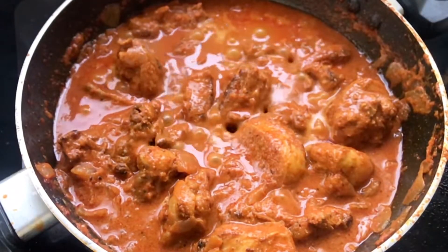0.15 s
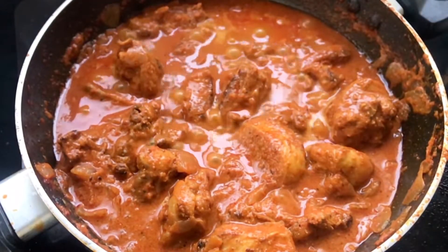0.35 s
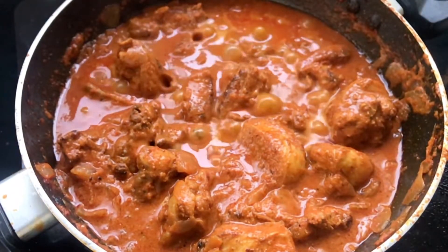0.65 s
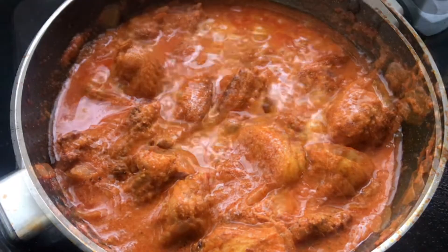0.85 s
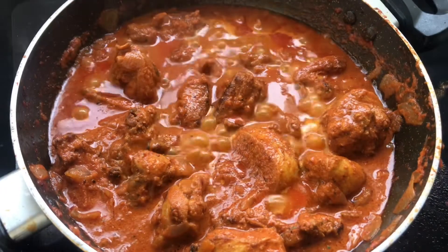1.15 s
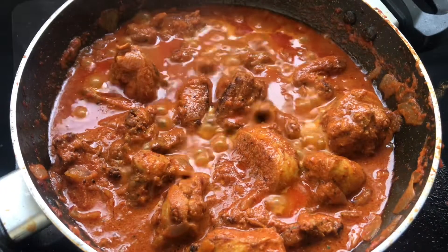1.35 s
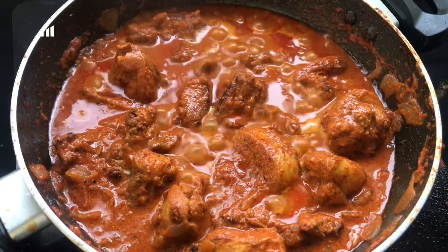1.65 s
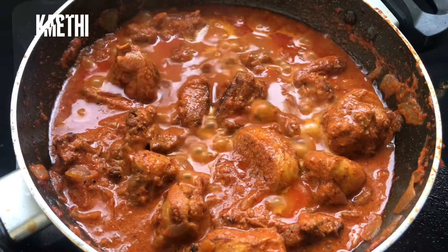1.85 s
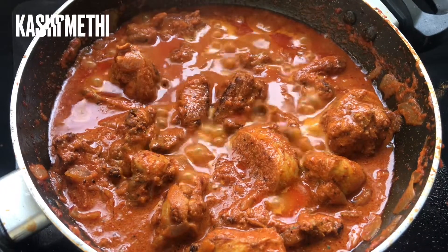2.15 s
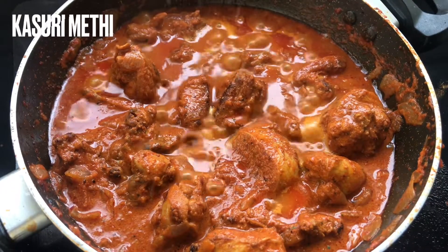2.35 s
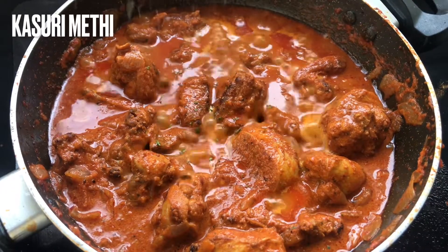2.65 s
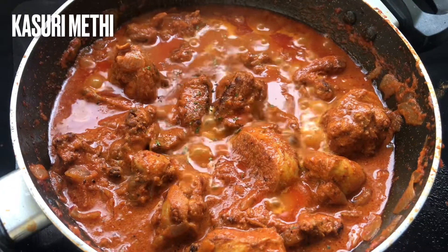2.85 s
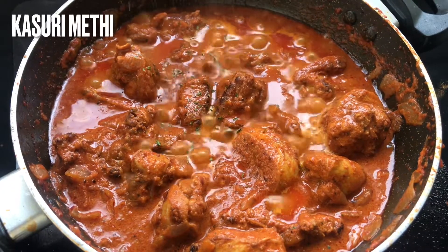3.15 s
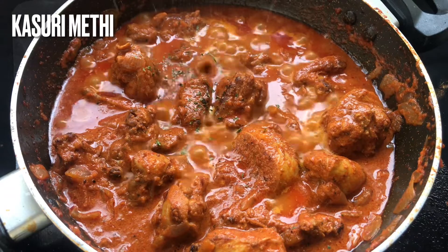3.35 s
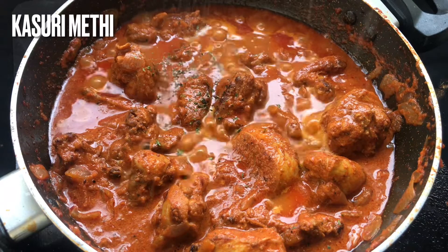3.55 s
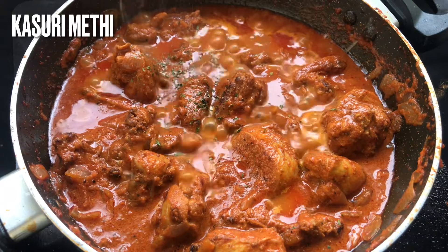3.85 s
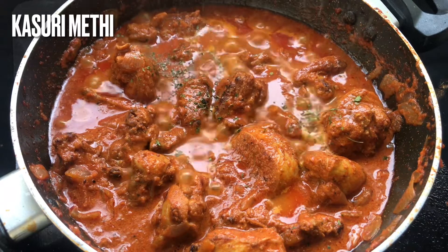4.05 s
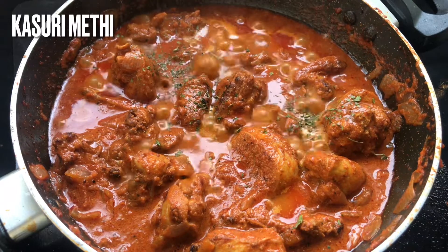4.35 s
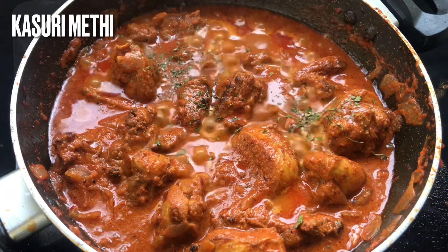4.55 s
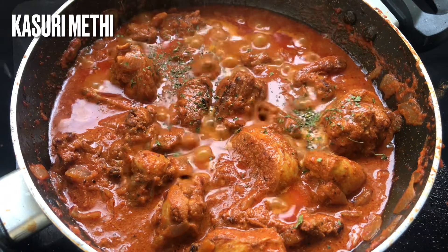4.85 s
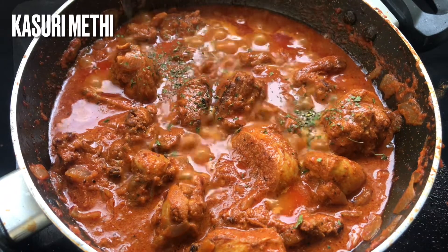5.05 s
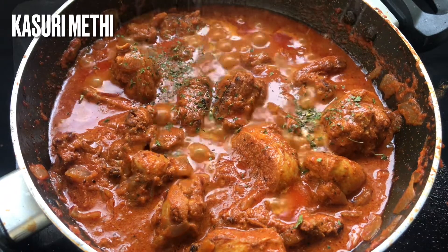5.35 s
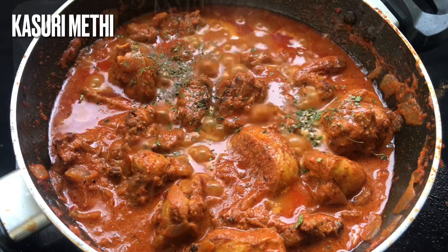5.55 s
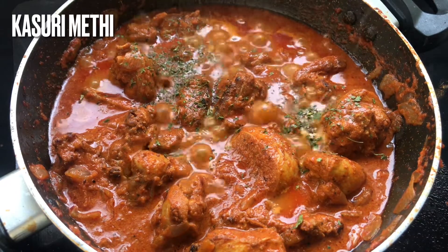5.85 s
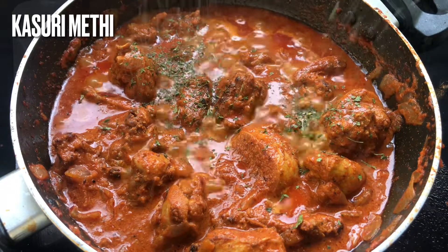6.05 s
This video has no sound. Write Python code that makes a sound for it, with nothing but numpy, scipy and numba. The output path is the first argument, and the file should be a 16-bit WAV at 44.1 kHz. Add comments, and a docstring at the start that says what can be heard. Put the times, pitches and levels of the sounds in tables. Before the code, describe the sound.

After a moment of silence, thick gravy fades in, simmering in a frying pan close to the microphone. Bubbles snap, plop softly and spit little puffs of steam over a fine crackle of fat. Behind them a kitchen fan blows and hums steadily, and the hob buzzes faintly. From about halfway, a low rumble swells, sinks and swells again as the spits thin out.

```python
"""A kitchen, one microphone close to a frying pan of thick, simmering gravy. After 0.6 s of silence the
sound fades in: bubbles spit steam, snap their skins and plop over a fine crackle of fat, the pan colouring
the spits, snaps and crackle. Behind it a fan hums and blows, and the hob buzzes and whines faintly.
From about 3 s a low rumble swells in the background; it sinks towards 5 s and swells once more at 5.5 s,
as the spits thin out."""
import sys
import numpy as np
from scipy import signal
from scipy.fft import rfft, irfft, next_fast_len
from scipy.io import wavfile
from numba import njit

SR = 44100
rng = np.random.default_rng(int(sys.argv[2]) if len(sys.argv) > 2 else 0)


def digitize_waveform(pressure):
    """Quantize a signal to 16-bit integers and store it at the path in sys.argv[1].

    Rows of a 2-D input are taken as channels; values are limited to [-1, 1].
    """
    field = np.atleast_2d(pressure).T
    bounded = np.clip(field, -1, 1)
    quanta = np.round(bounded * 32767).astype(np.int16)
    wavfile.write(sys.argv[1], SR, quanta)


N = 272662
TIME = np.arange(N) / SR
FFT_SIZE = next_fast_len(N)
FFT_HZ = np.fft.rfftfreq(FFT_SIZE, 1 / SR)


# the strongest spits of steam, close to the microphone: (time [s], level [dB], pitch of the hole [Hz])
STEAM_SPITS = [(0.85, -54, 4200), (0.96, -53, 3800), (1.035, -53, 2900), (1.25, -57, 3200),
               (1.351, -55, 4500), (1.46, -50.5, 4800), (1.545, -57, 4000), (1.851, -53, 3900),
               (1.934, -55, 3900), (2.218, -55.5, 3700), (2.32, -55.5, 4200), (2.496, -53, 6000),
               (2.781, -56, 7500), (2.824, -56, 5000), (2.873, -57, 9000), (2.96, -56, 5700),
               (3.044, -58, 7500), (3.162, -59, 8600), (3.198, -60, 6000), (3.493, -52.5, 7000),
               (3.573, -55, 4500), (3.702, -55, 4500), (3.786, -55.5, 6000), (3.895, -53.5, 4400),
               (3.993, -55.5, 7000), (4.066, -54.5, 2900), (4.161, -52.5, 3000), (4.346, -54, 3500),
               (4.426, -54, 3200), (4.664, -51.5, 5000), (4.757, -51.5, 3700), (4.843, -56.5, 3300),
               (4.933, -58, 6500), (5.11, -52, 4000), (5.18, -54.5, 4000), (5.295, -50, 6500),
               (6.09, -54, 6800)]

def spits(rise_s=0.0022, longest_s=0.027, split_hz=5500, hole_width_hz=800, hole_db=-8):
    """Steam sputters through a torn bubble: fizz, hiss and the hole's note, until the pressure runs out."""
    out, t = np.zeros(N), TIME[:SR // 8]
    wet_fizz = fizz(per_s=1500, spread_db=4.4, cycles=22)
    grainy_hiss = level(pan_ring(noise() * undb(3 * walk(350))), -2)
    jet = butterworth(wet_fizz + grainy_hiss, 2, 2200, "high")
    low, high = (level(butterworth(jet, 3, split_hz, side), 0) for side in ("low", "high"))
    for s, db, hole_hz in list(STEAM_SPITS) + faint_spits():
        length_s = min(0.024 * 2 ** ((-54 - db) / 8), longest_s)  # louder spits are spent sooner
        pressure = (1 - np.exp(-t / rise_s)) * np.exp(-(t / length_s) ** 3)
        treble_db = 8 * np.log2(hole_hz / 5470)  # a smaller hole sounds higher and sprays more treble
        span = int(s * SR) + np.arange(len(t))
        spray = low.take(span, mode="wrap") + undb(treble_db) * high.take(span, mode="wrap")
        note = ring(rng.standard_normal(len(t)), [(hole_hz, hole_width_hz, 0)])
        spit = level(spray, db) + level(note, db + hole_db)
        add(out, s, spit * undb(0.33) * pressure)
    return out


def faint_spits(count=14, low_hz=2900, high_hz=10000):
    """Weak spits at random moments all over the pan, as rows like those of STEAM_SPITS."""
    when, weakness, pitch = rng.random((count, 3)).T
    starts = (np.arange(count) + when) / count * N / SR
    return list(zip(starts, -60 - weakness, low_hz * (high_hz / low_hz) ** pitch))


# the loudest bubble skins snapping, close by: (time [s], peak level [dB], cavity pitch [Hz])
SKIN_SNAPS = [(0.9832, -36, 3840), (1.042, -42, 2930), (1.3542, -38.5, 2820), (1.5566, -34, 2830),
              (1.853, -40, 3820), (1.8604, -43, 3840), (1.937, -41.5, 3790), (2.2438, -37, 3470),
              (2.3496, -34, 4250), (2.5342, -36.5, 2890), (2.7798, -39, 2880), (3.1922, -29.5, 5460),
              (4.3869, -40, 3850), (4.7666, -32, 2840), (4.9721, -42.5, 3720), (5.205, -39.5, 6490),
              (5.7074, -41.5, 3740)]

def snaps(tear_s=0.0019, cavity_width_hz=1900, click_db=-18, wall_s=0.0012, wall_gain=.5):
    """A skin tears in a millisecond or two and rings the cavity below it; the pan wall throws it back."""
    out, t = np.zeros(N), TIME[:SR // 40]
    for s, db, hz in SKIN_SNAPS:
        tear = rng.standard_normal(len(t)) * np.exp(-t / tear_s)
        cavity = [(hz, cavity_width_hz, 0)]
        clarity = min(hz / 3800, 1.4) ** 2  # smaller, higher cavities ring more clearly
        ping = level(ring(ring(tear, cavity), cavity), 0) * clarity
        snap = level(pan_ring(tear), 0) + ping + level(tear, click_db)
        echo_delay = int(wall_s * rng.uniform(0.64, 1.1) * SR)  # each at its own distance from the wall
        snap = snap + wall_gain * np.roll(snap, echo_delay)
        add(out, s, snap * undb(db) / np.abs(snap).max())
    return out


# larger bubbles that plip in the gravy: (time [s], peak level [dB], pitch [Hz])
CLEAR_PLIPS = [(0.809, -42, 2220), (1.165, -41, 2180), (2.318, -41, 2780), (4.078, -42, 2820)]

def plops(count=70, low_hz=650, high_hz=2900):
    """Soft, well damped bubbles ring in the thick gravy, with a few clearer plips."""
    when, pitch, weakness = rng.random((count, 3)).T
    soft_hz = low_hz * (high_hz / low_hz) ** pitch
    soft = bubbles(when * N / SR, soft_hz, undb(-46 - 2.2 * weakness), cycles=9.0, glide=0.07)
    s, db, hz = np.array(CLEAR_PLIPS, float).T.copy()
    return soft + bubbles(s, hz, undb(db), cycles=8.4, glide=0.0083)


def crackle(fat_db=-66, sputter_db=-69, sputters_per_s=45, sputter_s=0.0037):
    """Countless tiny bubbles in the fat, with faint sputters of steam among them, in loose clusters."""
    onsets = (rng.random(N) < sputters_per_s / SR) * rng.random(N)
    decays = signal.lfilter([1], [1, -np.exp(-1 / (sputter_s * SR))], onsets)
    sputters = level(pan_ring(decays * noise()), sputter_db)
    fat = fizz(per_s=700, spread_db=4.6, cycles=23) * undb(fat_db)
    clusters = undb(2 * walk(10))
    return (fat + sputters) * clusters


def fizz(per_s, spread_db, cycles, low_hz=2300, high_hz=13500):
    """A cloud of tiny bubbles, each with a pitch of its own, coloured by the pan; rms 1."""
    when, pitch, strength = rng.random((30000, 3))[:int(per_s * N / SR)].T
    hz = low_hz * (high_hz / low_hz) ** pitch
    gains = undb(spread_db * np.minimum(-np.log(1 - strength), 3))  # many weak, a few strong
    cloud = bubbles(when * N / SR, hz, gains * np.sqrt(hz), float(cycles), glide=0.0088)
    return level(pan_ring(cloud), 0)


@njit
def bubbles(starts, hz, gains, cycles, glide):
    """Each bubble rings for some cycles, rising a little in pitch as it dies away."""
    out = np.zeros(N)
    for k in range(len(starts)):
        first, life = int(starts[k] * SR), cycles * SR / hz[k]
        for i in range(min(int(5 * life), N - first)):
            age = i / life
            phase = 2 * np.pi * cycles * age * (1 + glide * age / 2)
            out[first + i] += gains[k] * np.exp(-age) * np.sin(phase)
    return out


# resonances of the pan and the hollows in the gravy: (frequency [Hz], width [Hz], gain [dB])
PAN_MODES = [(2870, 470, 7), (3760, 540, 4), (4310, 570, 1), (5220, 166, 4), (6020, 1200, 2),
             (7700, 450, -10.5), (8300, 1100, -3.5), (11160, 470, -6.5), (12700, 2100, -15)]

def pan_ring(x):
    """The pan and the hollows in the gravy colour a sound made in them."""
    return ring(x, PAN_MODES)


def kitchen(x, t60_s=0.17, wet_db=-6):
    """Hard walls near the pan return a short diffuse tail to the microphone."""
    t = TIME[:SR // 2]
    tail = rng.standard_normal(len(t)) * np.exp(-np.log(1000) * t / t60_s) * (t > .005)
    return x + undb(wet_db) * signal.fftconvolve(x, tail / np.linalg.norm(tail))[:N]


# spectrum of the fan's air, behind the pan: (frequency [Hz], relative level [dB])
AIR_SPECTRUM = [(20, -16), (32, -1), (55, -13), (110, -0.5), (250, 0.5), (520, 0), (950, 0.5), (1350, -2.5),
                (1700, -6.5), (2050, -13), (3200, -21), (6000, -26.5), (10300, -34), (16000, -29.5)]
# resonances of the fan's housing: (frequency [Hz], width [Hz], gain [dB])
HOUSING_MODES = [(198.5, 13.4, -9.5), (230.6, 10.5, -8), (584, 10, -14), (914, 13, -7), (968, 17, -4.5),
                 (1116, 14, -8.5)]
# tones of the fan's blades: (frequency [Hz], level [dB])
BLADE_TONES = [(386.8, -44), (489.9, -63), (1766, -69.5)]

def fan(air_db=-44.5, flutter_db=0.8, wander=0.001426):
    """Air rushes through the housing, and the blade tones waver in the turbulence."""
    air = colour(noise(), AIR_SPECTRUM)
    rush = level(air + ring(air, HOUSING_MODES), air_db) * undb(0.99 * walk(16))
    rotor_time = np.cumsum(1 + wander * walk(4.75)) / SR
    blades = sum(level(np.sin(2 * np.pi * hz * rotor_time) * undb(flutter_db * walk(23)), db)
                 for hz, db in BLADE_TONES)
    return rush + blades


def hob(mains_hz=50, hum_db=-49, whine_hz=14420, roughness_hz=560, wander_hz=45, whine_db=-67.5):
    """Under the pan, a hum at twice the mains rate and a thin, rough whine that pulses with it."""
    hum_phase = 2 * np.pi * 2 * mains_hz * TIME
    whine_phase = 2 * np.pi * np.cumsum(whine_hz + wander_hz * walk(3)) / SR
    whine = walk(roughness_hz) * np.cos(whine_phase) + walk(roughness_hz) * np.sin(whine_phase)
    pulse = 1 + 0.34 * np.cos(hum_phase)
    hum = np.sin(hum_phase) * undb(walk(2))
    return level(hum, hum_db) + level(whine * pulse * undb(walk(6)), whine_db)


# resonances of the steady rumble in the background: (frequency [Hz], width [Hz], gain [dB])
BED_MODES = [(63, 7.6, -9.5), (79.3, 9.6, -8.5), (92, 14, -4)]
# course of the low drone's pitch: (time [s], pitch [Hz])
DRONE_GLIDE = [(1.2, 82), (2.6, 75), (3.6, 75.4), (5.5, 80.6)]
# swells of the low drone: (time [s], level [dB])
DRONE_SWELL = [(1.0, -58), (2.5, -58), (2.95, -48), (3.25, -51), (3.5, -43.5), (3.78, -43), (4.0, -52),
               (4.5, -54), (4.95, -66), (5.5, -46), (5.8, -56)]
# the drone's upper tones: (frequency [Hz], relative level [dB])
UPPER_TONES = [(125, -4.5), (139, 0)]
# swells of the upper tones: (time [s], level [dB])
UPPER_SWELL = [(1.0, -67.9), (3.5, -55.5), (3.95, -46), (4.35, -55.2), (4.95, -62), (5.4, -55)]

def rumble(bed_db=-54, upper_trim_db=-1, waver_db=2, wander=.014):
    """In the background, a low drone swells and recedes over a steady rumble."""
    def tone(hz):
        """A sine that wavers in pitch and level."""
        phase = 2 * np.pi * np.cumsum(hz * (1 + wander * walk(7.1))) / SR
        return np.sin(phase) * undb(waver_db * walk(15))
    bed = colour(ring(noise(), BED_MODES), [(40, -7), (62, 9.5), (100, 1.5), (200, -8)])
    drone = level(tone(curve(DRONE_GLIDE)), 0) * undb(curve(DRONE_SWELL))
    upper = sum(undb(db) * tone(hz) for hz, db in UPPER_TONES)
    upper = level(upper, upper_trim_db) * undb(curve(UPPER_SWELL))
    return drone + upper + level(bed, bed_db)


def undb(db):
    """Decibels to gain."""
    return 10 ** (np.asarray(db) / 20)


def level(x, db):
    """Scale to an rms level."""
    return x * undb(db) / np.sqrt(np.mean(x ** 2) + 1e-20)


def noise():
    """White noise for the whole scene."""
    return rng.standard_normal(N)


def walk(rate):
    """Smooth random drift of rms 1, changing about rate times a second."""
    spectrum = rfft(noise(), FFT_SIZE) * np.exp(-(FFT_HZ / rate) ** 2)
    return level(irfft(spectrum, FFT_SIZE)[:N], 0)


def curve(points):
    """Join (time [s], value) points by straight lines."""
    return np.interp(TIME, *np.transpose(points))


def colour(x, points):
    """Filter by a spectrum of (frequency [Hz], gain [dB]) points."""
    hz, db = np.transpose(points)
    gain = undb(np.interp(np.log(FFT_HZ + 1), np.log(hz), db))
    return irfft(rfft(x, FFT_SIZE) * gain, FFT_SIZE)[:N]


def butterworth(x, order, hz, side):
    """Pass the "low" or "high" side of a frequency."""
    return signal.sosfilt(signal.butter(order, hz, side, fs=SR, output="sos"), x)


def ring(x, modes):
    """Parallel resonances: (frequency [Hz], width [Hz], gain [dB])."""
    return sum(undb(db) * signal.lfilter(*signal.iirpeak(hz, hz / width, SR), x) for hz, width, db in modes)


def add(out, s, x):
    """Mix a short sound in at time s."""
    i = int(s * SR)
    out[i:i + len(x)] += x[:max(N - i, 0)]


def scene():
    """One microphone position: the pan close up in its kitchen, over fan, hob and rumble."""
    pan = kitchen(spits() + snaps() + crackle() + plops())
    return (pan + fan() + hob() + rumble())[None]


def record(dry, silence_s=0.61, fade_s=0.51, top_hz=15800):
    """The microphone is faded up almost linearly after a silence, with the highest treble cut off."""
    fade = np.clip((TIME - silence_s) / fade_s, 0, 1) ** 0.98
    return signal.sosfilt(signal.ellip(12, .1, 80, top_hz, fs=SR, output="sos"), dry * fade)


dry = scene()
out = record(dry)
digitize_waveform(out)
```